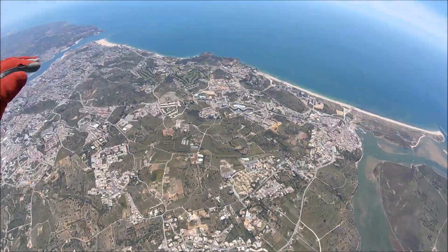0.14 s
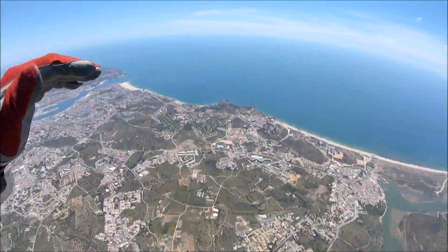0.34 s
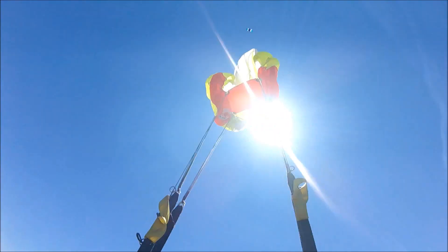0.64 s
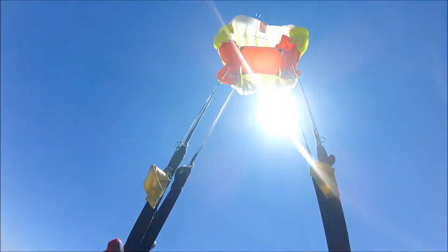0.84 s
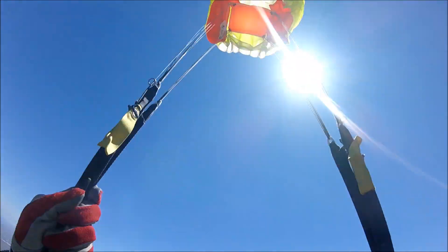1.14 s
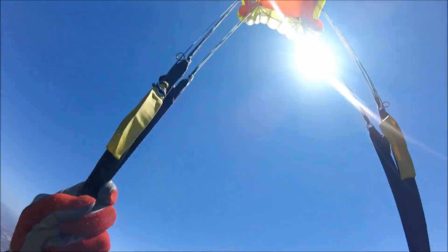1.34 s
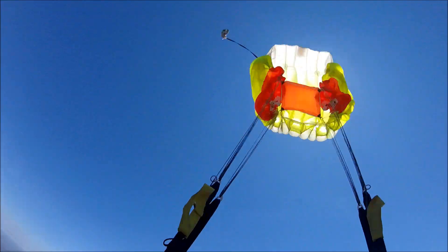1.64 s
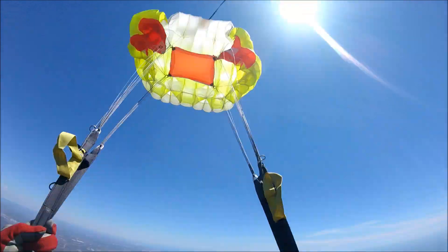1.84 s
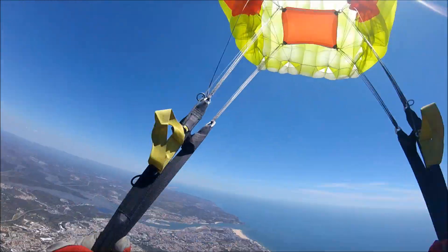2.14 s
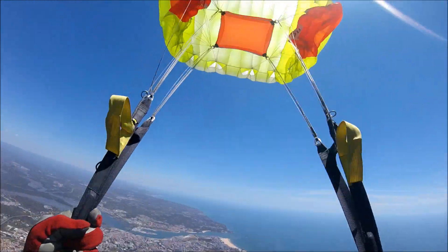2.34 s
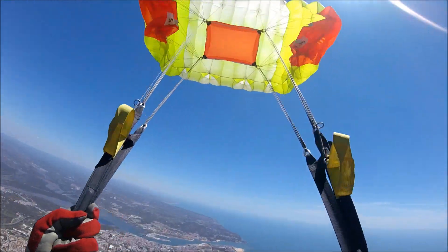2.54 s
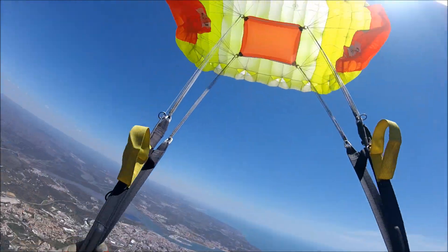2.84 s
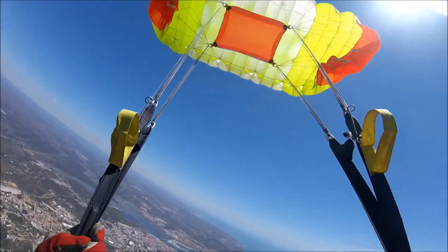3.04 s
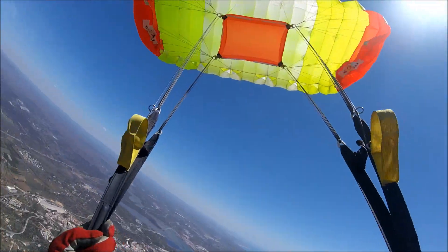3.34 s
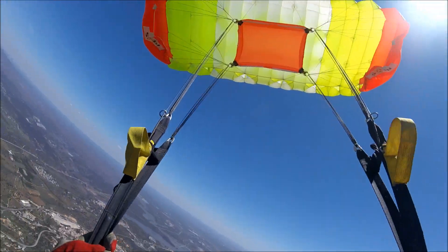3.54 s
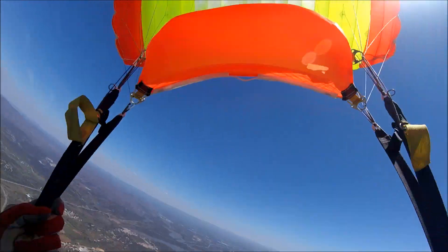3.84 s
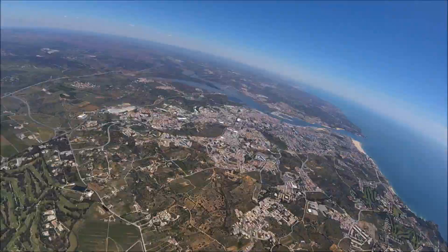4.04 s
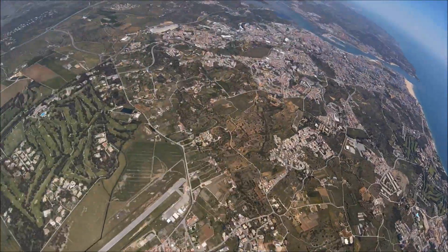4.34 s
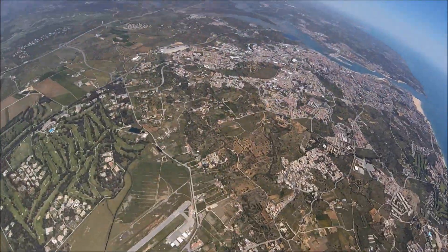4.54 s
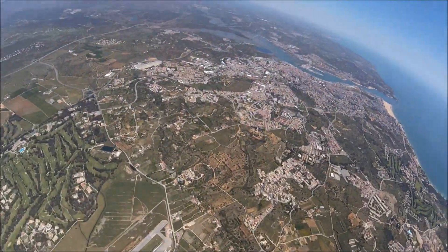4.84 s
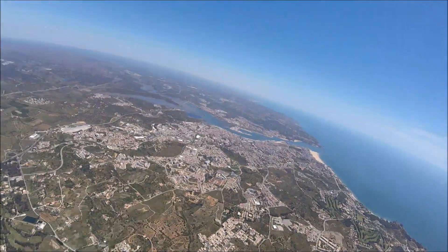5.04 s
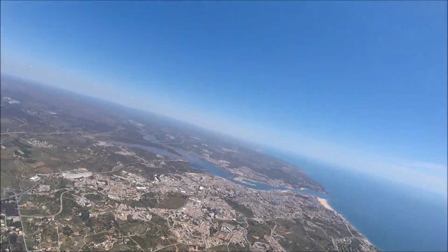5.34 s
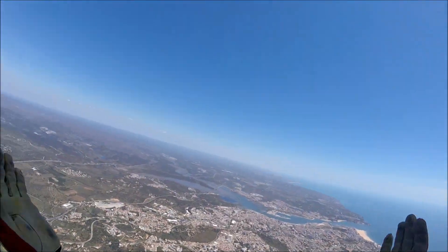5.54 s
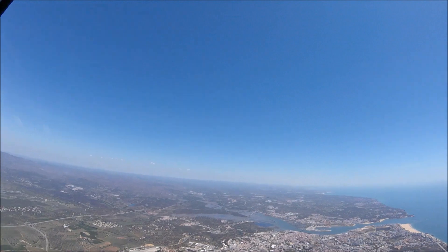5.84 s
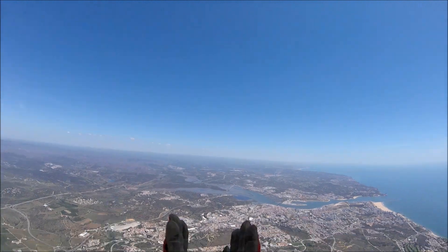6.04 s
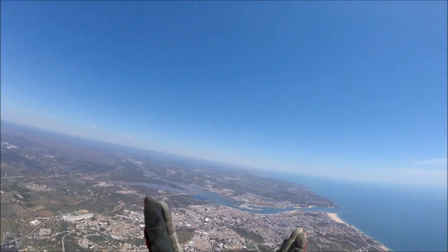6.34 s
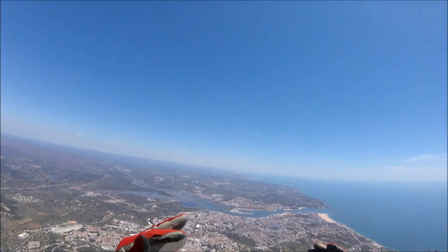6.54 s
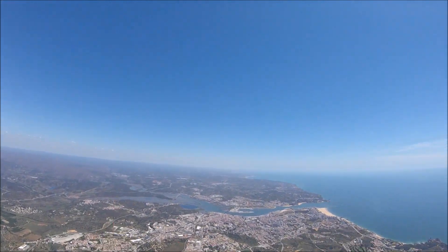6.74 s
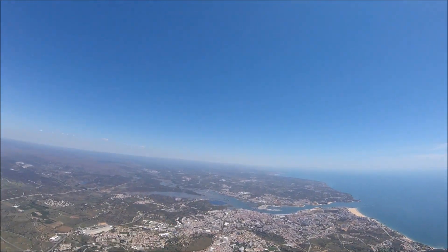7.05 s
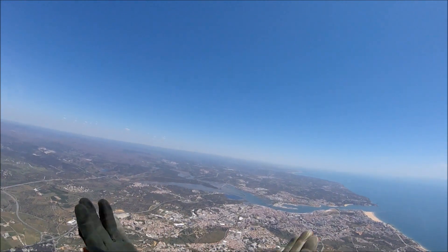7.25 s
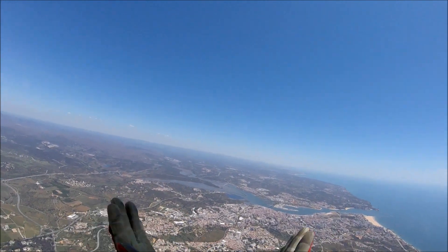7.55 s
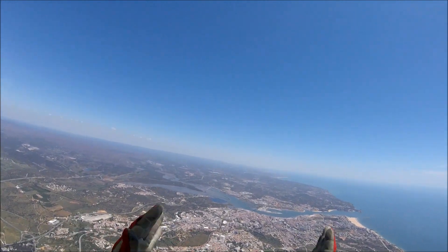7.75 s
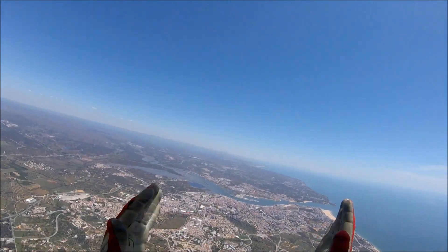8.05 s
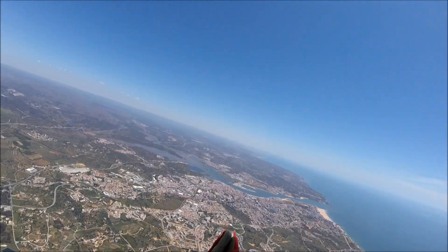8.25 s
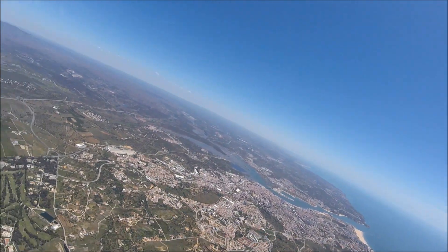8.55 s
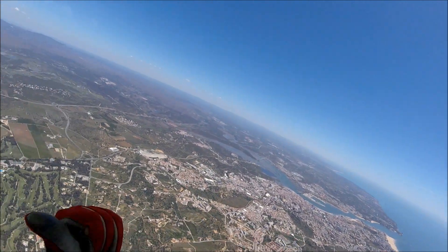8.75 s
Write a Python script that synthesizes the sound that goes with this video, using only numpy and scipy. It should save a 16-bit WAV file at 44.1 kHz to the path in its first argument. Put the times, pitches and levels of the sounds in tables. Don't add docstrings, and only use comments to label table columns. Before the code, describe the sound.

A housed camera microphone sits right in the airstream, outdoors and dry. From 0 to 0.4 seconds strong freefall wind roars and hisses, with a knock at the start and another near 0.2. The hiss then drops away, and from about 0.5 to 0.8 straps knock and cloth snaps in a dense clatter with low shoves of air. From 0.8 to 3 it is much quieter: soft muffled wind, scattered snaps, and a short swell of air around 1.95. Between 3.1 and 3.8 gust thumps and fabric cracks return. Around 3.9 wind rises and a loose panel flaps loudly, sharp cracks about twelve to thirteen per second, slowing slightly until 6.15. The flapping stops, and until about 8.9 steady gliding wind rushes with low buffeting gusts, particularly near 7.8 and 8.1, while lines and straps tick crisply and irregularly, denser around 8 to 8.3.

```python
import sys
import numpy as np
from scipy import signal
from scipy.fft import rfft, irfft, next_fast_len
from scipy.io import wavfile
from scipy.ndimage import uniform_filter1d, minimum_filter1d, map_coordinates

SR = 44100
rng = np.random.default_rng(int(sys.argv[2]) if len(sys.argv) > 2 else 0)


def gain_from_decibels(decibels):
    exponent = np.asarray(decibels, float) / 20
    return 10 ** exponent


def output_pcm(signal):
    pcm = np.clip(np.atleast_2d(signal).T, -1, 1) * 32767
    wavfile.write(sys.argv[1], SR, np.round(pcm).astype(np.int16))


N = 392921
CREST, TAIL = 2048, 4096


def unit(x):
    return x / np.sqrt(np.mean(x ** 2) + 1e-20)


def wobble(rate):
    knots = rng.standard_normal(int(N * 400 / SR) + 4)
    return map_coordinates(knots, [np.arange(N) * min(rate, 400) / SR])


def curves(rows):
    s, *cols = np.transpose(rows)
    return [np.interp(np.arange(N) / SR, s, c) for c in cols]


def bumps(rows, height):
    t = np.arange(0, N, 64) / SR
    total = sum(height(size) * np.exp(-((t - s) / half) ** 2) for s, size, half in rows)
    return np.interp(np.arange(N) / SR, t, total)


def coloured(x, spectrum):
    size = 8192
    f, db = np.transpose(spectrum)
    log_hz = np.log(np.fft.rfftfreq(size, 1 / SR) + 1)
    shape = np.interp(log_hz, np.log(f), db, left=db[0] - 53.0, right=db[-1] - 21.5)
    cepstrum = irfft(np.log(gain_from_decibels(shape)))
    cepstrum[1:size // 2] *= 2
    cepstrum[size // 2 + 1:] = 0
    kernel = irfft(np.exp(rfft(cepstrum)))
    return signal.fftconvolve(x, kernel / np.linalg.norm(kernel))[:N]


def crackle(per_s, spread_db):
    chance, size, sign = rng.random((3, N))
    heights = gain_from_decibels(-spread_db * np.log(size + .03))
    return unit((chance < per_s / SR) * heights * np.sign(sign - .35))


def turbulence(spectrum, lumps_db, vortices):
    lumps = gain_from_decibels(7 * np.tanh(lumps_db / 7))
    return unit(coloured(lumps * (rng.standard_normal(N) + vortices), spectrum))


def pulse(hz, cycles, lead, spread):
    turns = np.arange(-CREST, TAIL) / SR * hz
    swell = np.exp(np.where(turns < 0, -(turns / lead) ** 2, .5 - np.hypot(.5, turns / cycles)))
    return swell * np.cos(2 * np.pi * turns + 0.4 + spread * (rng.random() - .5))


# time_s [s], speed_db [dB of hiss], churn_db [dB of eddy]
AIRFLOW = [(0, -36.5, -15.5), (.4, -41.5, -19.5), (.46, -53.5, -22), (.72, -57.5, -36.5),
           (.78, -60.5, -34.5), (1.07, -60.5, -39), (1.6, -61, -31.5), (1.95, -49, -25.5),
           (2.27, -55.5, -30), (3.2, -52.5, -26.5), (3.67, -54.5, -25.5), (3.99, -47, -28),
           (4.04, -42, -22.5), (5.35, -44, -26), (5.96, -47, -24), (6.02, -49.5, -28), (6.9, -46.5, -26.5),
           (8.91, -45, -26.5)]
# centre_s [s], peak_db [dB], half_length_s [s]
GUSTS_ON_PORT = [(0.12, -7.5, 0.015), (0.653, -10.5, 0.09), (0.893, -15, 0.016), (1.11, -20.5, 0.3),
                 (1.29, -20, 0.058), (1.598, -21, 0.1), (1.943, -19.5, 0.052), (2.115, -16, 0.05),
                 (2.868, -39, 0.05), (3.035, -18.5, 0.2), (3.254, -11, 0.024), (3.434, -13, 0.11),
                 (3.656, -30, 0.033), (4.005, -15, 0.053), (5.254, -26, 0.026), (5.468, -22, 0.049),
                 (5.89, -15.5, 0.072), (6.495, -15, 0.011), (6.613, -13.5, 0.041), (6.843, -16.5, 0.048),
                 (6.97, -23, 0.085), (7.177, -18.5, 0.044), (7.46, -16, 0.068), (7.775, -10.5, 0.04),
                 (8.056, -10.5, 0.075), (8.362, -13, 0.18), (8.655, -16.5, 0.082)]
# centre_s [s], change_db [dB], half_length_s [s]
EDDY_SURGES = [(.11, -5, 0.21), (.19, 8.5, 0.011), (.28, 5.5, 0.089), (.155, -3, 0.013), (1.93, -4, 0.012),
               (1.81, 6, 0.012), (5.62, 3.5, 0.11), (.62, -15, 0.012), (1.3, 16, 0.011), (1.39, -9, 0.034),
               (1.48, 3, 0.12), (1.72, 9.5, 0.014), (2.46, 6, 0.018), (2.58, -3.5, 0.11),
               (2.81, 3.5, 0.068), (3.04, 4.5, 0.017), (3.395, -5, 0.011), (3.58, 7, 0.01), (4.05, 4, 0.1),
               (5.36, 2, 0.26), (6.11, -5.5, 0.1), (6.4, -5.5, 0.019), (3.425, 4, 0.017),
               (6.74, -2.5, 0.025), (7.83, 3, 0.023), (3.125, 2, 0.012), (6.95, 2, 0.038)]
# centre_s [s], hiss_change_db [dB], half_length_s [s]
HISS_SWELLS = [
    (.33, 3.5, 0.051),
    (6.12, -5.5, 0.23),
    (7.0, -1, 0.17),
]


def airflow():
    speed_db, churn_db = curves(AIRFLOW)
    surge_db = bumps(EDDY_SURGES, float)
    calm_db = -23.5 + 0.59 * (churn_db + 31.0)
    swell_db = 20 * np.log10(1 + bumps(GUSTS_ON_PORT, gain_from_decibels) / gain_from_decibels(calm_db))
    rush_db = -34 + (speed_db + 50) + 0.027 * (churn_db + 23.5)
    return (calm_db + swell_db + 0.57 * surge_db,
            churn_db + 0.46 * swell_db + surge_db,
            rush_db + 0.1 * swell_db + 0.57 * surge_db,
            speed_db + 0.097 * surge_db + bumps(HISS_SWELLS, float))


# pitch_hz [Hz], level_db [dB per Hz]
BUFFET_SPECTRUM = [(10, -38.5), (20, -2), (35, -4.5), (60, 0), (110, -6), (180, -17.5), (400, -30.5),
                   (1000, -96.5)]
EDDY_SPECTRUM = [(60, -26.5), (130, 1), (200, -1), (350, -5), (600, -13), (1200, -25.5), (3000, -54.5)]
RUSH_SPECTRUM = [(250, -25.5), (550, -2.5), (800, 2), (1400, -2.5), (2200, -9.5), (3200, -18),
                 (5000, -37.5), (9000, -52.5)]
HISS_SPECTRUM = [(2300, -30.5), (3700, -9), (6000, -1), (9000, -4.5), (13000, -2)]


def wind():
    buffet_db, eddy_db, rush_db, hiss_db = airflow()
    gust, shed, flick = wobble(14), wobble(35), wobble(120)
    big, small, fine = crackle(70, 3.7), crackle(250, 5.0), crackle(1500, 1.4)
    puffs = signal.lfilter([1], [1, -.994], np.abs(crackle(45, 3.5)))
    puff_db = 20 * np.log10(1 + 0.65 * unit(puffs))
    ragged = np.clip(1 - .03 * (hiss_db + 45.5), .3, 2)

    buffet = turbulence(BUFFET_SPECTRUM, 0.14 * gust + wobble(22), .5 * big)
    eddy_lumps = 1.26 * gust + 1.97 * shed + 0.24 * wobble(30) + 1.7 * ragged * puff_db
    eddy = turbulence(EDDY_SPECTRUM, eddy_lumps, 0.99 * big + 0.71 * small)
    rush_lumps = 0.11 * gust + 1.12 * shed + 1.57 * flick + 0.35 * wobble(25) + 0.5 * puff_db
    rush = turbulence(RUSH_SPECTRUM, ragged * rush_lumps, 0.51 * big + .5 * small + 0.17 * fine)
    hiss_lumps = 0.13 * gust + 0.3 * shed + 0.32 * flick + wobble(45) + 0.96 * puff_db
    hiss = turbulence(HISS_SPECTRUM, ragged * hiss_lumps, 0.59 * big + fine)
    rush = rush + gain_from_decibels(1.22 * (hiss_db + 45.5)) * np.gradient(rush)

    low = gain_from_decibels(buffet_db - 1.38) * buffet + gain_from_decibels(eddy_db + 2.0) * eddy
    return low + gain_from_decibels(rush_db + 0.5) * rush + gain_from_decibels(hiss_db + 5.5) * hiss


# centre_s [s], peak_db [dB], pitch_hz [Hz]
SHOVES = [(0.003, 6, 242), (0.646, 6, 210), (0.673, 5, 130), (0.74, 1, 171), (1.223, 3.5, 109),
          (1.964, 6, 172), (2.115, 1, 170), (3.142, -1, 141), (3.234, 3, 290), (3.257, -9, 116),
          (3.385, -16, 121), (3.684, 3.5, 160), (3.927, 2.5, 105), (4.053, 9, 300), (4.166, -13, 177),
          (7.765, -26, 160), (7.775, 3, 132), (7.984, 4.5, 128), (8.021, -14, 110), (8.604, 1.5, 181),
          (8.663, 6.5, 170)]


def jolts():
    waves = np.zeros(N + CREST + TAIL)
    for s, db, hz in SHOVES:
        wave = pulse(hz, 0.077, 0.66, 2 * np.pi)
        waves[round(s * SR):][:CREST + TAIL] += gain_from_decibels(db - 6.0) * wave
    return waves[CREST:CREST + N]


def flickers(count):
    when, size, taut, bright = rng.random((count, 4)).T
    s = .45 + 3.3 * when
    rush_db = airflow()[2][(s * SR).astype(int)]
    db = rush_db - 16 - 7 * np.log(size + 0.12)
    return np.column_stack([s, db, db + 13 * taut, -12 + 12 * (bright - .5)])


# centre_s [s], drag_db [dB], crack_db [dB], sizzle_db [dB]
OPENING_CLOTH = [(.427, -33, -24, -13), (.517, -41, -26, -9), (.58, -32, -15, -16), (.6, -35, -28, -17),
                 (.61, -50, -11, -8), (.647, -25, -20, -12), (.659, -42, -18, -16), (.668, -36, -20, -7),
                 (.676, -37, -26, -10), (.69, -48, -13, -12), (.703, -36, -13, -14), (.71, -43, -12, -7),
                 (.725, -31, -18, -10), (.735, -39, -24, -11), (.744, -30, -15, -14), (.754, -58, -26, -18),
                 (.772, -50, -9, -13), (.786, -38.5, -24, -19), (.815, -37, -34, -24),
                 (.876, -37, -32, -18), (.956, -31, -15, -19), (1.185, -38, -35, -18),
                 (1.213, -35, -17, -17), (1.225, -32.5, -29, -21), (1.28, -42, -26, -16),
                 (1.336, -56, -15, -20), (1.625, -47, -29, -12), (1.256, -51, -18, -23),
                 (1.309, -29, -28, -10), (1.51, -37.5, -10.5, -19), (1.543, -33, -39, -20),
                 (1.612, -35.5, -21, -18), (1.656, -29.5, -30, -23), (1.703, -32, -13, -18),
                 (1.716, -43, -26, -10), (1.478, -44, -30, -20), (3.286, -38, -26, -24),
                 (3.428, -34, -24, -21), (1.96, -26.5, -32, -19.5), (3.122, -42, -6, -27),
                 (3.216, -31, -4.5, -20.5), (3.338, -37, -8, -28), (3.684, -33, -8, -14),
                 (3.77, -21, -25, -13.5)]
PANEL_FLAPS = [(3.868, -22.5, -3, -16.5), (3.93, -20.5, 1.5, -19), (3.995, -18, -27, -18),
               (4.043, -20, -27, -16), (4.104, -24.5, -20, -7.5), (4.167, -17.5, 8, -12.5),
               (4.235, -21, 2, -13), (4.302, -22, 2.5, -10), (4.373, -18.5, -11, -13),
               (4.448, -17.5, 6, -14.5), (4.522, -17, 0, -18), (4.601, -22, 4.5, -14), (4.678, -16, 5, -16),
               (4.756, -20, -25, -13), (4.835, -18.5, 2, -16.5), (4.912, -24, 0.5, -14),
               (4.99, -19.5, -9, -14.5), (5.072, -18, -14, -15.5), (5.153, -20, 6, -13),
               (5.234, -20.5, 2, -10.5), (5.314, -19.5, -9, -10), (5.401, -20, -1, -13.5),
               (5.49, -19.5, -8, -9.5), (5.581, -18.5, 3, -12), (5.663, -17, -10, -10),
               (5.764, -22, 6, -16), (5.852, -23.5, 0.5, -9.5), (5.954, -23, -3.5, -12),
               (6.041, -35, 2, -6), (6.144, -27.5, 2.5, -12)]
WEAKER_SLAPS = [(.565, -39, -25, -11), (.657, -49, -17, -16), (1.022, -44, -26, -24),
                (1.297, -45, -17, -17), (1.318, -50, -31, -18), (1.378, -44, -22, -15),
                (2.185, -48, -32, -19), (7.88, -50, -26, -1), (3.245, -32.5, -28, -20),
                (3.382, -33, -6, -29), (3.58, -35, -26, -31), (5.834, -25, -13, -13),
                (3.938, -48, -26, -18), (4.269, -28, -12, -22), (4.662, -48, -13, -19),
                (4.718, -25, -30, -25), (4.796, -27, -30, -23), (4.946, -27, -19, -28),
                (4.506, -34, -21, -18), (4.638, -29, -18, -20), (5.775, -39, -14, -18),
                (5.752, -27, -24, -16), (5.026, -27.5, 1, -23), (5.059, -46, -8, -25),
                (5.111, -25, -30, -16), (5.192, -29.5, -30, -19), (5.36, -26, -4, -33),
                (5.451, -23, -30, -15.5), (5.542, -26, -30, -16), (5.724, -28.5, -19, -33),
                (6.033, -33, -3, -13)]
LINE_TICKS = [(6.165, -34, -16, -14), (6.219, -38, -29, -1), (6.246, -28, -35, -19), (6.472, -48, -9, -10),
              (6.495, -35, -30, -7), (6.51, -25.5, -25, -9), (6.59, -28, -32, -25), (6.615, -24, -39, -17),
              (6.786, -33, -37, -9), (6.863, -60, -27, 10), (7.018, -25.5, -37, -9),
              (7.088, -44, -29, 11.5), (7.096, -41, -11.5, -5.5), (7.153, -46, -33, 8),
              (7.284, -31, -35, -10), (7.376, -47, -11, -10), (7.388, -30, -9, -4), (7.526, -44, -13, -15),
              (7.685, -20.5, -5, -12), (7.97, -28.5, -1, -9.5), (8.084, -28, -29, -8),
              (8.166, -28, 0.5, -14), (8.183, -32, -33, -3), (8.2, -37, 2.5, -22), (8.214, -31, -22, -11),
              (8.277, -22, -2, -9), (8.412, -29.5, -30, -5), (8.49, -35, -30, 0), (8.004, -40, -28, -4),
              (8.607, -33, -39, -5), (7.738, -40, -20, 1), (8.755, -32, -4.5, -15.5), (8.76, -36, -16, -10),
              (7.42, -40, -12, -11), (7.574, -46, -32, 2), (8.872, -50, -38, 1), (7.497, -34, -30, -3)]


def cloth():
    period = np.gradient(np.transpose(PANEL_FLAPS)[0])
    tick_s, backswing_hz = 0.003, 1160
    kinds = [(OPENING_CLOTH, 0.01, 1140),
             (PANEL_FLAPS, 0.22 * period, 131 / period),
             (WEAKER_SLAPS, 0.016, backswing_hz),
             (LINE_TICKS, tick_s, 1750),
             (flickers(count=36), tick_s, backswing_hz)]
    rows = []
    for table, length, hz in kinds:
        ones = np.ones(len(table))
        rows.append(np.column_stack([table, length * ones, hz * ones]))
    rows = np.vstack(rows)
    scatter = np.exp(rng.standard_normal((len(rows), 2)) * [0.022, 0.028])
    return np.column_stack([rows[:, :4], rows[:, 4:] * scatter])


# pitch_hz [Hz], level_db [dB per Hz]
THUMP_SPECTRUM = [(80, -6), (250, -4.5), (600, 2.5), (1000, -6.5), (2500, -53.5)]
SNAP_SPECTRUM = [(300, -33), (900, -6), (1600, 4), (2300, -2.5), (3500, -14), (6000, -35)]
SPIT_SPECTRUM = [(2000, -31.5), (3800, -6), (6000, 1), (12500, -4.5)]


def fabric(events):
    t = np.arange(-2048, 2048) / SR
    _, eddy_db, rush_db, _ = airflow()
    body, sizzle = np.zeros((2, N + len(t)))
    for s, db, _, sizzle_db, length, _ in events:
        edge = np.abs(t - .0015) / (max(length, .004) * np.where(t < 0, .45, .6))
        drag = np.exp(-(1.1 * edge) ** 1.5)
        fizzle = np.exp(-(1.61 * edge * np.where(t < 0, 0.94, 1)) ** 1.5)
        body[round(s * SR):][:len(t)] += gain_from_decibels(db - .6) * drag
        sizzle[round(s * SR):][:len(t)] += gain_from_decibels(db + sizzle_db + 7.5) * fizzle
    grit = 0.73 * crackle(1500, 4.4) + 0.71 * rng.standard_normal(N)
    grit = unit(grit * gain_from_decibels(5 * np.tanh(wobble(300))))
    fizz = rng.standard_normal(N) * gain_from_decibels(5.0 * np.tanh(wobble(350)))
    body = body[2048:2048 + N] * grit
    sizzle = sizzle[2048:2048 + N] * unit(.4 * grit + fizz)
    thump = body * gain_from_decibels(0.74 * (eddy_db - rush_db) + 0.5)
    return coloured(thump, THUMP_SPECTRUM) + coloured(body, SNAP_SPECTRUM) + coloured(sizzle, SPIT_SPECTRUM)


def snaps(events):
    waves, clicks = np.zeros(N + CREST + TAIL), np.zeros(N + 256)
    spit = 0.99 * np.exp(-np.arange(256) / SR / 0.00068)
    for s, _, db, sizzle_db, _, hz in events:
        waves[round(s * SR):][:CREST + TAIL] += gain_from_decibels(db - 6) * pulse(hz, 0.21, 0.41, 1.5)
        clicks[round(s * SR):][:256] += gain_from_decibels(db + sizzle_db - 4.0) * spit
    return waves[CREST:CREST + N] + coloured(clicks[:N] * rng.standard_normal(N), SPIT_SPECTRUM)


def cracks(rows, cycles, lead, lift_db, slack):
    waves = np.zeros(N + CREST + TAIL)
    for s, db, hz in rows:
        turns = np.arange(-CREST, TAIL) / SR * hz
        kick = slack * np.clip(2 - hz / 1000, 0, 1)
        rise, fall = -(turns / 0.11) ** 2, 1 - np.hypot(1, 2 * turns / 0.44)
        push = np.exp(np.where(turns < 0, rise, fall))
        push -= 0.28 * np.exp(-np.abs(turns - 1) / 1.6)
        wave = (1 - kick) * pulse(hz, cycles, lead, 1.5) + kick * 2 * push
        waves[round(s * SR):][:CREST + TAIL] += gain_from_decibels(db + lift_db) * wave
    return waves[CREST:CREST + N]


# crest_s [s], peak_db [dB], pitch_hz [Hz]
STRAP_SNAPS = [(0.007, -7, 2080), (0.013, -21, 1150), (0.19, -3.5, 1020), (0.516, -15.5, 930),
               (0.58, -7.5, 860), (0.586, -9.5, 800), (0.599, -17, 1110), (0.61, -14, 1010),
               (0.643, -8.5, 930), (0.649, -12, 1190), (0.668, -15, 1250), (0.725, -16, 1120),
               (0.731, -11, 910), (0.742, -11.5, 950), (0.746, -16, 1010), (0.819, -29, 1160),
               (0.876, -21, 1140), (0.951, -27, 1180), (0.957, -16, 1220), (1.021, -34, 1270),
               (1.213, -22, 1050), (1.223, -15, 910), (1.226, -23, 900), (1.256, -20, 1100),
               (1.307, -22, 780), (1.31, -16, 850), (1.51, -19.5, 960), (1.521, -20, 1000),
               (1.611, -14, 790), (1.627, -19, 900), (1.66, -18, 810), (1.962, -20, 780), (2.183, -17, 780),
               (2.406, -23, 1130), (2.817, -17, 820), (3.121, -17, 940), (3.131, -11, 800),
               (3.338, -22, 1180), (3.377, -22, 1070), (3.381, -22, 1120), (3.564, -14.5, 816),
               (3.582, -26, 1090), (3.681, -13, 920), (3.685, -19, 940), (3.769, -14, 1210),
               (3.781, -11, 1050), (6.416, -12.5, 1180), (6.53, -14, 1220), (6.786, -15, 1070),
               (7.096, -16, 1830), (7.388, -9.5, 2200), (7.526, -13.5, 1570), (7.683, -15, 1800),
               (7.691, -10, 1110), (7.97, -8, 1910), (8.085, -7.5, 1330), (8.2, -10, 1810),
               (8.277, -10, 1810), (8.478, -12, 1240), (8.659, -12, 795)]


def strap_cracks():
    return cracks(STRAP_SNAPS, 0.37, 0.61, lift_db=0.6, slack=0.75)


# crest_s [s], peak_db [dB], pitch_hz [Hz]
HEM_SNAPS = [(3.87, -10, 1360), (3.876, -7, 980), (3.93, -21, 1600), (3.937, -12, 1520),
             (3.987, -2.5, 1080), (3.992, -16, 1080), (4.152, 1, 980), (4.167, -7, 1700),
             (4.171, -15, 1350), (4.238, -2, 1800), (4.27, -10, 1220), (4.298, -4, 1430), (4.303, 0, 1790),
             (4.375, -18, 1350), (4.45, 1, 1710), (4.456, -9, 1790), (4.522, -11, 1250), (4.527, -7, 1400),
             (4.6, 4.5, 1890), (4.604, -5, 1580), (4.662, -10, 1310), (4.676, -6, 1770), (4.681, 7, 990),
             (4.752, -4, 2020), (4.759, -17, 1270), (4.837, 5.5, 1530), (4.912, -1, 1940), (4.959, 0, 980),
             (4.99, -7, 1610), (4.994, -8, 1130), (5.026, -15, 1420), (5.059, -7, 1500), (5.07, 1, 1290),
             (5.075, -13, 1270), (5.079, -10, 1290), (5.154, 0.5, 1750), (5.16, 1, 1210), (5.236, -9, 1560),
             (5.31, -6, 1540), (5.317, 4.5, 1230), (5.36, -13, 1230), (5.385, 1, 1110), (5.401, -7, 1390),
             (5.494, 6, 925), (5.581, 2, 1310), (5.662, 5, 1240), (5.666, 2, 1120), (5.725, 1, 940),
             (5.763, -9, 1370), (5.847, -15, 1590), (5.851, -1, 1460), (5.858, 0.5, 1140),
             (5.952, -2.5, 1440), (5.96, -10, 980), (6.033, -10, 1000), (6.041, -8, 1550),
             (6.045, -12, 1740), (6.051, -8, 864), (6.144, 2, 1250), (6.148, -13, 1430)]


def hem_cracks():
    return cracks(HEM_SNAPS, 0.52, 0.51, lift_db=-3, slack=0.37)


def scene():
    events = cloth()
    air = wind() + jolts()
    return (air + fabric(events) + snaps(events) + strap_cracks() + hem_cracks())[None]


def band_limit(x):
    return signal.sosfilt(signal.butter(12, 13400, fs=SR, output="sos"), x)


# pitch_hz [Hz], gain_db [dB]
PORT_RESPONSE = [(2500, -2), (3850, -3), (4600, -6.5), (5250, -0.5), (5900, 1), (7000, -3), (8500, -11),
                 (10500, -20.5), (12200, -35), (14000, -86)]


def record(dry):
    f, db = np.transpose(PORT_RESPONSE)
    size = next_fast_len(N + 4096)
    x = dry / (1 + np.abs(dry / 1.05) ** 5) ** (1 / 5)
    housing = gain_from_decibels(np.interp(np.fft.rfftfreq(size, 1 / SR), f, db))
    x = irfft(rfft(x, size) * housing, size)[:, :N]

    hz, _, z = signal.stft(x[0], SR, nperseg=2048)
    treble = np.abs(z[380:520]).mean(0)
    floor = uniform_filter1d(minimum_filter1d(treble, size=5), size=5)
    steady = treble < 2.2 * floor
    strictness = np.interp(hz, [8200, 8800, 12000], [0, 1.2, 1.6])[:, None]
    step = steady * strictness * uniform_filter1d(np.abs(z), size=41, axis=0)
    faint = (np.abs(z) < np.maximum(gain_from_decibels(-100), step)) & (hz[:, None] > 8200)
    x = signal.istft(z * np.where(faint, gain_from_decibels(-24), 1), SR, nperseg=2048)[1][None, :N]
    return band_limit(x)


dry = scene()
out = record(dry)
output_pcm(out)
```